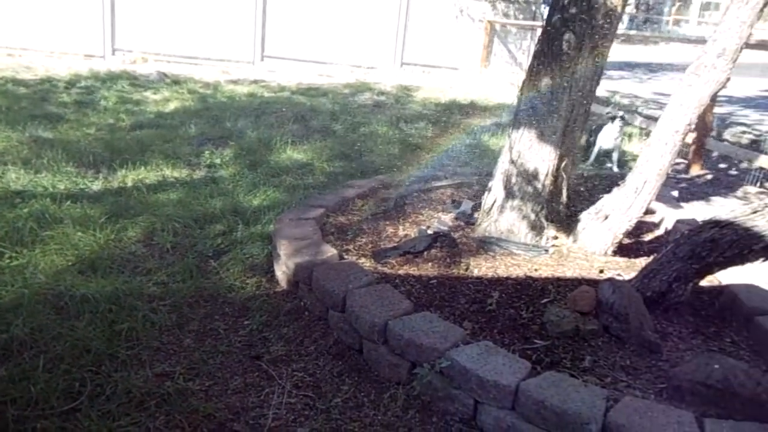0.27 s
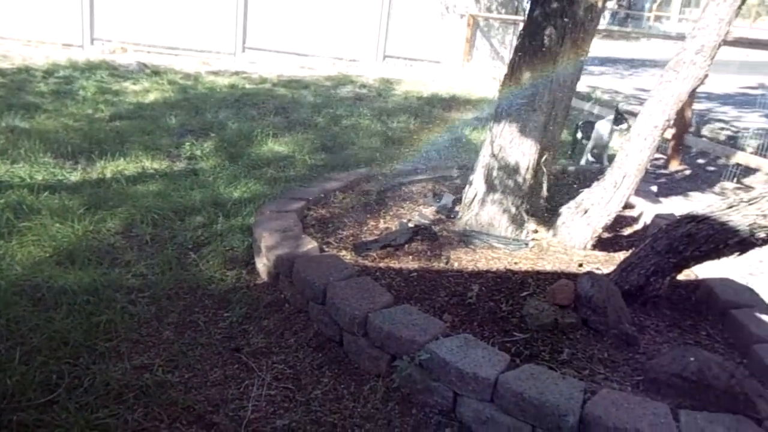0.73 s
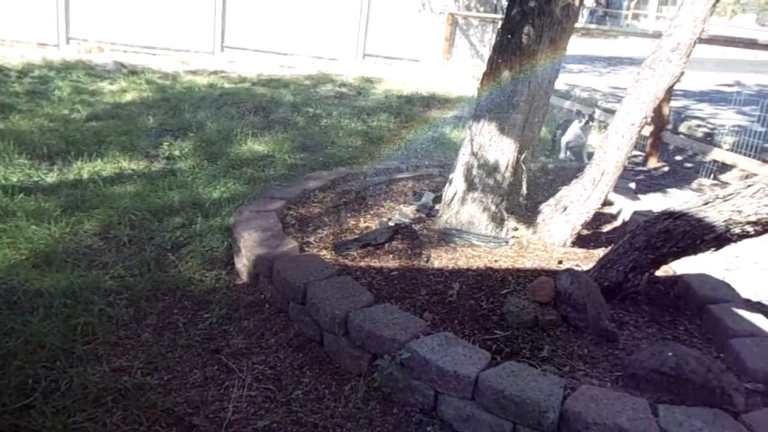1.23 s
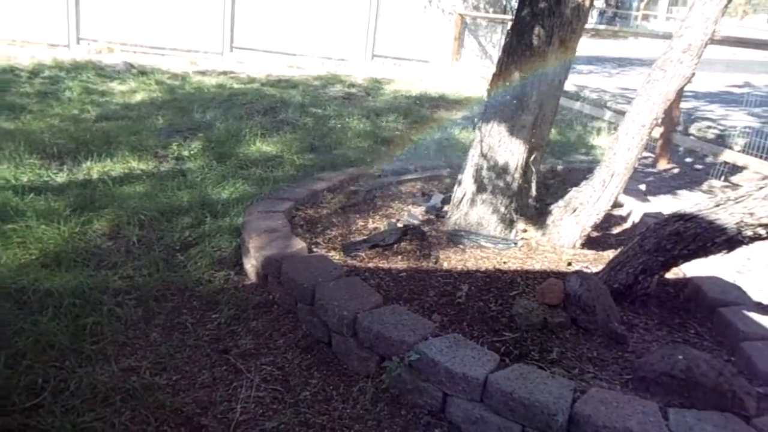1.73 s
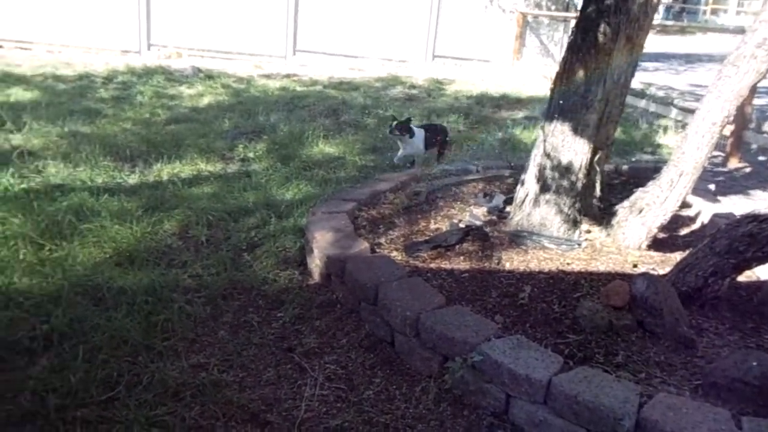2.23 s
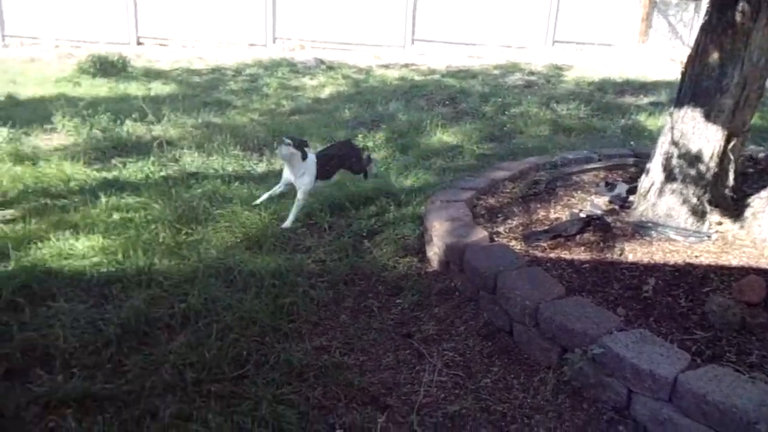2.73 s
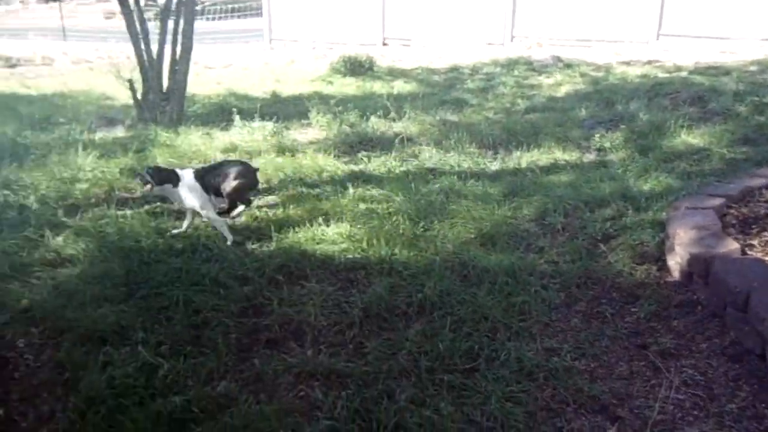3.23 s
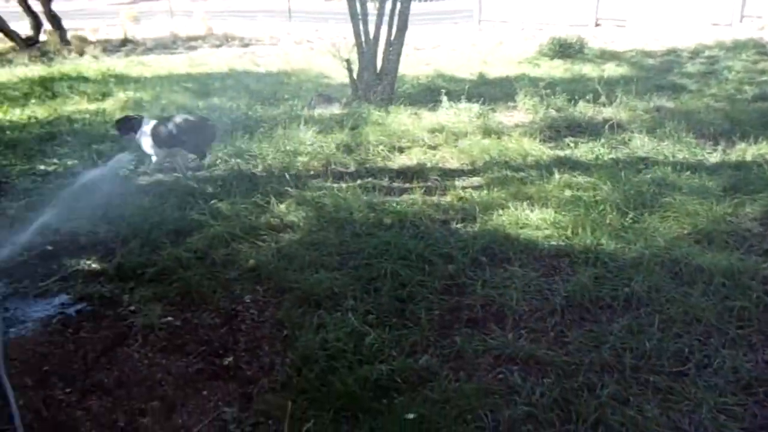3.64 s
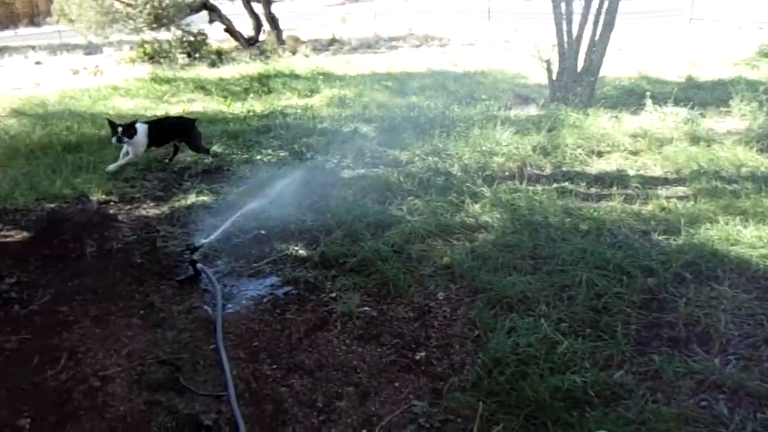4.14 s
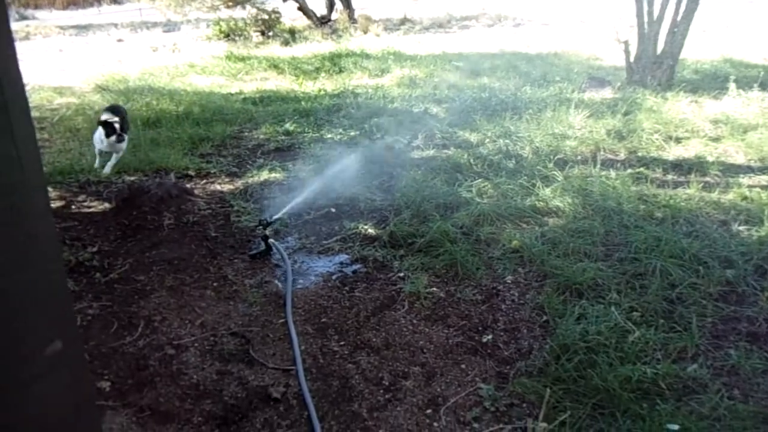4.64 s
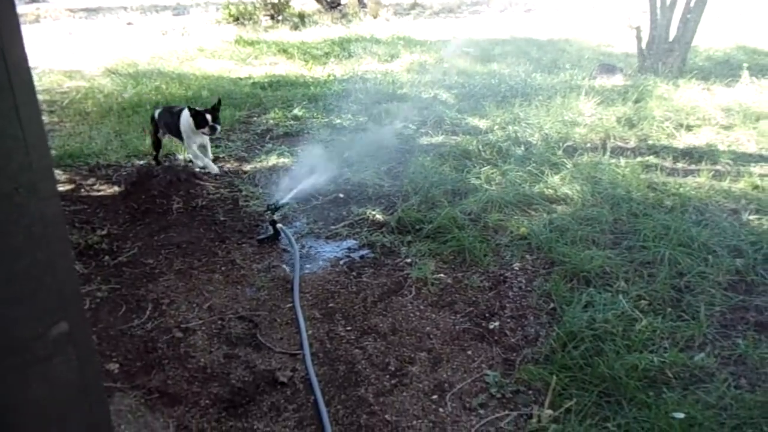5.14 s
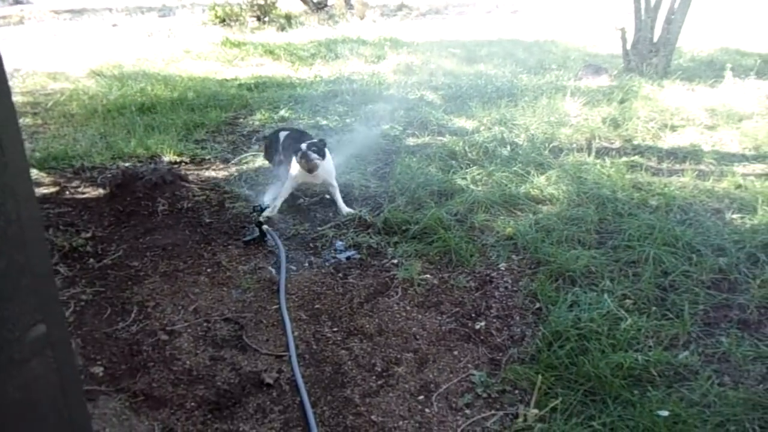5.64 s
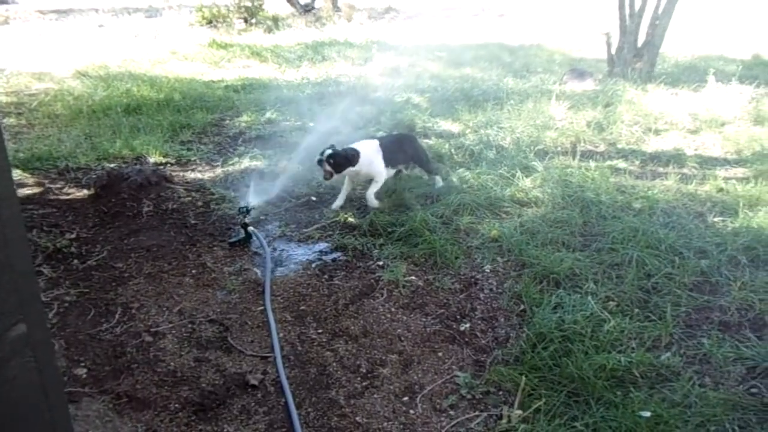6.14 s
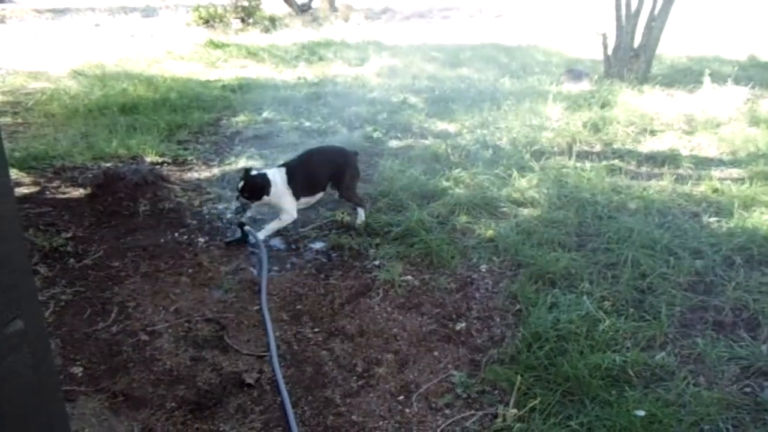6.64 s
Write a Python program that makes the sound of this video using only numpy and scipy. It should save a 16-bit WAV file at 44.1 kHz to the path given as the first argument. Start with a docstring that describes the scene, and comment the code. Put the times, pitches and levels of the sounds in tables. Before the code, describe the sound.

A small rotary sprinkler sprays a lawn with a high, rapidly pulsing hiss, occasional sharp spits and a fine patter of drops. The hiss changes colour as the microphone is carried closer. Wind buffets the microphone with a low rumble, stronger in the second half, and a few soft thuds occur. Near the end the jet spatters and drums on a dog's muzzle. The neighbourhood hums faintly far behind.

```python
"""A small rotary lawn sprinkler chops its hissing jet into about 17 spurts a second, with the odd spit.
The hiss shifts colour as the microphone is carried closer, over a fine patter of drops on grass.
Near the end a dog pushes its muzzle into the jet, which spatters and drums against it.
Soft thuds dot the scene, wind buffets the microphone and the neighbourhood hums far behind."""
import sys
import numpy as np
from scipy import signal
from scipy.fft import rfft, irfft
from scipy.io import wavfile
from scipy.ndimage import uniform_filter1d

SR = 44100
rng = np.random.default_rng(int(sys.argv[2]) if len(sys.argv) > 2 else 0)


def store_pcm(level_fs):
    """Save levels as 16-bit WAV."""
    pcm = np.round(np.clip(level_fs, -1, 1) * 32767).astype(np.int16)
    wavfile.write(sys.argv[1], SR, np.atleast_2d(pcm).T)


N = 303849
TIME = np.arange(N) / SR

# speed of the rotor: time_s, spurts_per_s
ROTOR_SPEED = [(0, 16.034), (.7, 15.641), (1.5, 16.569), (2.3, 16.736), (3.3, 17.184), (4.5, 17.805),
               (5.7, 17.451), (6.9, 17.064)]
# envelope of one spurt, the jet facing the microphone at half a turn: phase_turns, relative_db
SPURT_SHAPE = [(0, -22), (.1, -25.5), (.25, -7.5), (.35, -6.5), (.45, -2.1), (.52, -1.5), (.6, -3),
               (.7, -10), (.78, -22), (1, -19)]
# level ride of the jet as the microphone is carried past: time_s, relative_db
JET_RIDE = [(0, -30.5), (.25, -35), (1.25, -33), (1.7, -35), (2.4, -34), (3.4, -32), (4.65, -30.5),
            (5.7, -31.5), (6.4, -33.5)]
# sharp spits at the nozzle: start_s, relative_peak_db
NOZZLE_SPITS = [(.956, -17), (3.1303, -12), (3.821, -14), (4.6109, -10), (4.7262, -11), (4.773, -19),
                (4.953, -24), (5.018, -18), (5.415, -9)]
# aim of the microphone: time_s, view (0 away from the sprinkler, 1 side on, 2 facing it)
MIC_AIM = [(0, 0.23), (1.4, 0), (2.4, .09), (3, 0.4), (3.4, 1.25), (3.85, 1.63), (4.3, 2.11), (6.89, 2)]
# colour of the hiss in each view: frequency_hz, relative_db
AWAY_EQ = [(400, -31), (1380, -22.5), (1850, -12), (2650, -8.5), (3300, -7), (4250, -14.5), (5100, -1.5),
           (5500, -1.5), (6150, -11), (7050, -3), (8700, -9.5), (10300, -8.5), (12600, -11.5), (14200, -20)]
SIDE_EQ = [(400, -18), (1150, -21.5), (2400, 1), (3050, -12.5), (3650, -11), (4400, -7), (5100, -1.5),
           (5650, -4), (6300, -5.5), (7150, .5), (8750, -12.5), (9950, -1.5), (11300, -6.5), (14200, -12)]
FACING_EQ = [(400, -30), (950, -28.5), (1300, -15.5), (2100, -12), (3050, -3.5), (3750, -10.5), (4400, -3),
             (5100, -0.5), (5900, -9), (6850, -4), (8200, -6), (9800, -8), (11000, -11.5), (14200, -15.5)]
# two narrow rings in the hiss, gliding as the microphone moves: time_s, lower_hz, upper_hz, relative_db
HISS_RINGS = [(0, 5200, 6960, 3), (1.3, 5700, 7080, 3), (2.3, 5340, 7080, 3.5), (3.1, 5120, 7150, 5.5),
              (3.4, 5000, 7250, 0), (3.6, 5850, 7700, 8.5), (3.85, 5800, 6900, 5.5), (4.1, 5570, 6800, 2),
              (4.6, 5030, 6800, 4), (6.4, 5170, 6900, 1)]
# sheen on the top treble: time_s, relative_db
TREBLE_SHEEN = [(0, -2.5), (1.8, -0.5), (3, 2.5), (3.5, -3), (4.3, 2), (4.8, 0), (5.7, 0), (6.4, 1)]
# the jet spatters on the dog: start_s, length_s, level_db, centre_hz, width_octaves
DOG_SPLASHES = [(5.666, 0.028, -26, 2920, 0.36), (5.673, 0.029, -28.5, 7500, 0.62),
                (5.724, 0.036, -26.5, 4830, 1.3), (6.489, 0.068, -29, 5900, 1.1),
                (6.526, .027, -29, 2600, 0.57), (6.562, 0.066, -29.5, 2600, 1.26),
                (6.62, 0.027, -28.5, 4730, 0.68), (6.648, 0.043, -28.5, 4080, 1),
                (6.688, 0.016, -25.5, 4040, .6), (6.699, 0.026, -20.5, 4200, 0.78),
                (6.725, 0.039, -23, 4100, 0.95), (6.758, .066, -29.5, 5880, 1.4),
                (6.824, 0.015, -26.5, 4700, 0.98), (6.837, .046, -28.5, 4500, 1.2)]
# water drums hollowly on muzzle and body: start_s, length_s, level_db, pitch_hz, width_octaves
DOG_DRUMMING = [(5.663, .03, -34.5, 1500, 0.19), (5.714, 0.039, -42.5, 1450, 0.13),
                (5.778, 0.036, -44, 1410, .2), (6.6, 0.05, -43, 1090, 0.17), (6.638, 0.12, -38, 430, .97),
                (6.849, 0.023, -32.5, 1710, .18)]
# colour of water on the wet coat and muzzle: frequency_hz, relative_db
WET_COAT_EQ = [(500, 6), (1900, 0), (2900, 5), (3700, -2), (4900, 6.5), (6000, -2.5), (7500, 1.5),
               (14000, 0)]
# soft thuds and plops: start_s, level_db, centre_hz, width_octaves, length_s
SOFT_THUDS = [(1.426, -47, 1110, 0.3, 0.088), (2.762, -34, 251, 0.23, 0.012), (3.12, -41, 270, 0.78, 0.031),
              (3.42, -35, 254, 0.39, 0.016), (3.484, -27, 149, 0.59, 0.0079), (4.72, -46, 776, 0.46, 0.028),
              (5.26, -43.5, 1220, 0.14, 0.024), (5.972, -32.5, 132, 0.54, 0.026),
              (6.147, -29, 120, 0.48, 0.013), (6.774, -14.5, 83, 0.55, 0.014)]
# push of the breeze between gusts: time_s, level_db
BREEZE_RIDE = [(0, -35), (1.1, -32.5), (1.8, -43), (2.9, -28), (3.5, -28.5), (4.1, -23), (4.65, -30.5),
               (5.25, -25.5), (5.9, -21.5), (6.55, -23), (6.89, -17.5)]
# gusts on the microphone: peak_s, length_s, push_db, eddies_re_push_db
MIC_GUSTS = [(0.043, 0.22, -25.5, -14.5), (0.464, 0.14, -19.5, -22), (0.627, 0.081, -27, -6.5),
             (0.884, 0.14, -20.5, -21), (1.07, 0.13, -27.5, -20), (2.537, 0.065, -28.5, -2.5),
             (2.75, .22, -39, 0), (3.119, 0.057, -12, -8), (3.28, 0.18, -18, -7), (3.5, 0.25, -21, 2),
             (3.658, 0.11, -18, -2), (3.77, 0.21, -17, -13), (4.435, 0.083, -15, -14),
             (4.758, 0.067, -17, -34), (4.88, 0.044, -30, -6), (5.004, .07, -29, -10),
             (5.18, .08, -28.5, -8), (5.56, 0.12, -15, -9.5), (5.81, 0.3, -19.5, -4.5),
             (6.015, .11, -25, 4.5), (6.144, 0.28, -16, -5), (6.253, .06, -23, -3), (6.355, 0.093, -17, -5),
             (6.767, 0.16, -12, -5)]
# the wind's sub-bass push, rumbling eddies and finer eddies: frequency_hz, relative_db
PUSH_EQ = [(3, -5), (8, -4), (15, 6), (23, -1), (32, -11), (50, -21), (120, -83), (300, -100)]
EDDY_EQ = [(18, -43), (32, 3), (55, -3), (75, -12), (120, -49), (300, -69), (1000, -95)]
FINE_EDDY_EQ = [(35, -31), (62, 5.5), (95, 5.5), (140, -9), (220, -21), (400, -32.5), (1000, -63),
                (4000, -85)]
# distant outdoor hum: frequency_hz, relative_db
YARD_EQ = [(20, 7.5), (60, 4), (100, -2), (155, 2.5), (225, -1.5), (305, 0.5), (365, -4.5), (440, -0.5),
           (540, -7.5), (720, -7), (1000, -12), (1400, -19), (3000, -20.5), (9000, -54)]

START_TURNS, SPURT_SPREAD_DB = 0.099, 1.17
WALL_ECHO_S, WALL_ECHO_DB = 0.0208, -14
RING_WIDTH_HZ, UPPER_RING_SHARE = 250, 0.6
SHEEN_HZ, SHEEN_WIDTH_HZ, TOP_HZ = 11900, 900, 14400
BREEZE_EDDIES_DB, WIND_CEILING = -10.5, 0.62
FINE_DB, FINE_GROWTH, FINE_PIVOT_DB = -7.5, 0.14, -16.5


def jet():
    """The rotor sweeps the hissing jet past the microphone once a turn; a wall repeats each spurt."""
    turns = np.cumsum(follow(ROTOR_SPEED)[0]) / SR + START_TURNS
    sweep_db = np.interp(turns % 1, *np.transpose(SPURT_SHAPE))
    strength_db = SPURT_SPREAD_DB * rng.standard_normal(size=256)[turns.astype(int)]
    flow = unit(amp(sweep_db + strength_db + 0.88 * wander(160)))  # the jet breaks up unevenly
    spurts = flow * water(per_s=3400, spread_db=1, share=0.33) * amp(follow(JET_RIDE)[0] + 0.29)
    spurts *= amp(np.interp(TIME, [6.48, 6.6], [0, -6]))  # the dog blocks the nozzle
    echo = amp(WALL_ECHO_DB) * np.roll(spurts, round(WALL_ECHO_S * SR))
    return mic_colour(spurts + echo, contrast=1.15)


def spits():
    """Now and then the nozzle snaps out a larger slug of water."""
    out, t = np.zeros(N), TIME[:512]
    for start_s, peak_db in NOZZLE_SPITS:
        click = rng.standard_normal(len(t)) * np.exp(-t / 0.00031)
        snap = colour(click, FACING_EQ)[:256]
        add(out, start_s, amp(peak_db + 0.5) * snap / abs(snap).max())
    return out


def patter():
    """The spray lands all over the lawn as a steady fine rain, from many directions at once."""
    gain = amp(-37 + wander(23))
    return gain * mic_colour(water(per_s=1500, spread_db=5.5, share=0.24), contrast=0.55)


def water(per_s, spread_db, share):
    """Fine mist with a share of its power in separate drops, many small and a few large."""
    mist = rng.standard_normal(N)
    sizes = amp(spread_db * np.minimum(rng.exponential(1, N), 4))
    drops = unit(sizes * rng.choice([-1, 1], N) * (rng.random(N) < per_s / SR))
    return np.sqrt(1 - share) * mist + np.sqrt(share) * drops


def mic_colour(hiss, contrast):
    """A moving EQ that follows the microphone's aim at even power; less contrast flattens its peaks."""
    hz, t, spectrum = signal.stft(hiss, SR, nperseg=256, noverlap=192)
    hz = hz[:, None]
    curves = follow(MIC_AIM) + follow(HISS_RINGS) + follow(TREBLE_SHEEN)
    view, lower_hz, upper_hz, height_db, sheen_db = (np.interp(t, TIME, c) for c in curves)
    views = [AWAY_EQ, SIDE_EQ, FACING_EQ]
    tone_db = sum(np.maximum(1 - abs(view - k), 0) * eq_db(eq, hz) for k, eq in enumerate(views))
    for ring_hz, ring_db in [(lower_hz, height_db), (upper_hz, UPPER_RING_SHARE * height_db)]:
        tone_db += ring_db * np.exp(-((hz - ring_hz) / RING_WIDTH_HZ) ** 2)
    tone_db += sheen_db * np.exp(-((hz - SHEEN_HZ) / SHEEN_WIDTH_HZ) ** 2)
    patches = uniform_filter1d(rng.standard_normal(spectrum.shape), size=3, axis=0)
    tone_db += 0.9 * unit(uniform_filter1d(patches, size=24, axis=1))  # flicker from spurt to spurt
    tone = amp(tone_db * contrast) * (hz < TOP_HZ)
    tone /= np.sqrt(np.mean(tone ** 2, axis=0))
    return signal.istft(spectrum * tone, SR, nperseg=256, noverlap=192)[1][:N]


def dog_spatters():
    """The jet breaks on the dog in coarse, fluttering splashes, some with a hollow note."""
    spray = water(per_s=2500, spread_db=3.0, share=0.38) * amp(1.2 * wander(200))
    splash = colour(spray, WET_COAT_EQ)
    out = np.zeros(N)
    for start_s, length_s, level_db, hz, octaves in DOG_SPLASHES + DOG_DRUMMING:
        add(out, start_s, amp(level_db) * burst(splash, start_s, length_s, hz, octaves))
    return out


def thuds():
    """Dull, soft thuds and plops without any ring; the deepest are wind buffets on the microphone."""
    out, noise = np.zeros(N), rng.standard_normal(N)
    for start_s, level_db, hz, octaves, length_s in SOFT_THUDS:
        add(out, start_s, amp(level_db) * burst(noise, start_s, length_s, hz, octaves))
    return out


def wind():
    """Gusts swell out of the breeze, push on the microphone and shed eddies, finer as they get stronger."""
    push_power = amp(follow(BREEZE_RIDE)[0]) ** 2
    eddy_power = push_power * amp(BREEZE_EDDIES_DB) ** 2
    for peak_s, length_s, push_db, eddies_re_push_db in MIC_GUSTS:
        swell = amp(push_db) * np.exp(-(2 * (TIME - peak_s) / length_s) ** 2)
        push_power += swell ** 2
        eddy_power += (swell * amp(eddies_re_push_db)) ** 2
    eddy_db = 10 * np.log10(eddy_power)
    flutter_db = 3 * wander(22)
    fine_db = eddy_db + FINE_DB + FINE_GROWTH * (eddy_db - FINE_PIVOT_DB) + flutter_db
    push = np.sqrt(push_power) * turbulence(PUSH_EQ, steady_s=0.14)
    eddies = amp(eddy_db) * turbulence(EDDY_EQ, steady_s=0.086)
    fine = amp(fine_db) * turbulence(FINE_EDDY_EQ, steady_s=0.075)
    return WIND_CEILING * np.tanh((push + eddies + fine) / WIND_CEILING)  # big buffets clip softly


def turbulence(eq, steady_s):
    """Rumble whose level is held even over spans longer than steady_s."""
    rumble = colour(rng.standard_normal(N), eq)
    return rumble / np.sqrt(uniform_filter1d(rumble ** 2, int(steady_s * SR)) + 0.024)


def yard():
    """The far, even hum of the neighbourhood."""
    return amp(-43 + 0.5 * wander(11)) * colour(rng.standard_normal(N), YARD_EQ)


def burst(source, start_s, length_s, centre_hz, octaves):
    """A band-passed slice of the source: quick attack, hold, short tail; rms 1 over its length."""
    t = TIME[:SR // 4]
    hz = np.fft.rfftfreq(len(t), 1 / SR)
    piece = np.roll(source, -round(start_s * SR))[:len(t)]
    band = np.exp(-0.5 * (np.log2((hz + 1) / centre_hz) / octaves) ** 2)
    attack = 1 - np.exp(-t / 0.0052)
    release = np.exp(-np.maximum(t - 0.82 * length_s, 0) / (0.29 * length_s))
    sound = irfft(rfft(piece) * band, len(t)) * attack * release
    return sound / np.sqrt(np.sum(sound ** 2) / (length_s * SR))


def amp(db):
    """Decibels to gain."""
    return 10 ** (np.asarray(db) / 20)


def unit(x):
    """Scales to rms 1."""
    return x / np.sqrt(np.mean(x ** 2) + 1e-20)


def follow(rows):
    """A table's automation curves at every sample."""
    time_s, *columns = np.transpose(rows)
    return [np.interp(TIME, time_s, c) for c in columns]


def eq_db(eq, hz):
    """An EQ curve's gain in dB, in straight lines over log frequency."""
    points_hz, db = np.transpose(eq)
    return np.interp(np.log(hz + 1), np.log(points_hz), db)


def colour(x, eq):
    """Runs x through an EQ curve; rms 1."""
    hz = np.fft.rfftfreq(len(x), 1 / SR)
    return unit(irfft(rfft(x) * amp(eq_db(eq, hz)), len(x)))


def wander(per_s):
    """Smooth random modulation of rms 1, moving up to about per_s times a second."""
    hz = np.fft.rfftfreq(N, 1 / SR)
    return unit(irfft(rfft(rng.standard_normal(N)) * np.exp(-(hz / per_s) ** 2), N))


def add(mix, start_s, sound):
    """Mixes a sound in at start_s."""
    part = mix[max(round(start_s * SR), 0):][:len(sound)]
    part += sound[:len(part)]


def scene():
    """Water, dog, wind and yard in one mono mix."""
    return (jet() + spits() + patter() + dog_spatters() + thuds() + wind() + yard())[None]


def record(dry):
    """A steep low-pass trims the very top of the mix."""
    low_pass = signal.firwin(511, TOP_HZ, window=("kaiser", 9), fs=SR)
    return signal.oaconvolve(dry, low_pass[None], "same")


dry = scene()
out = record(dry)
store_pcm(out)
```